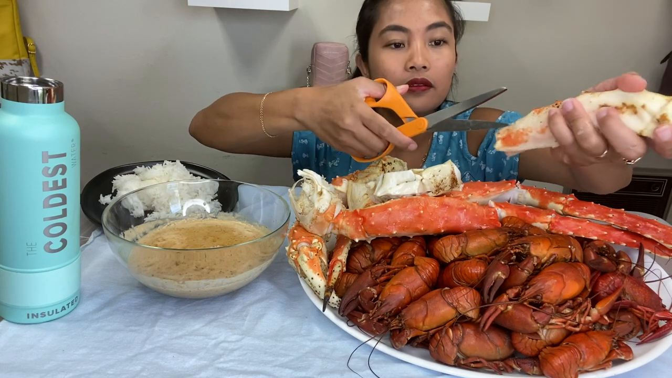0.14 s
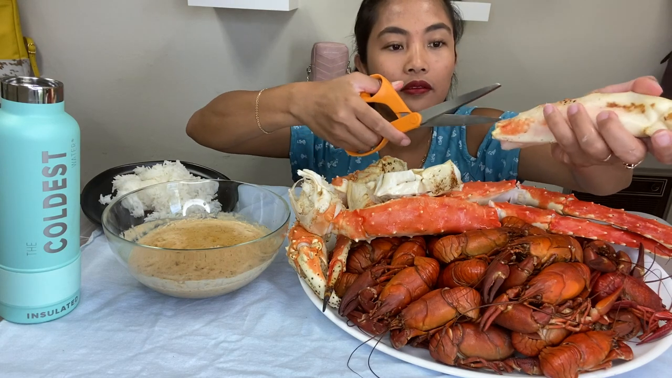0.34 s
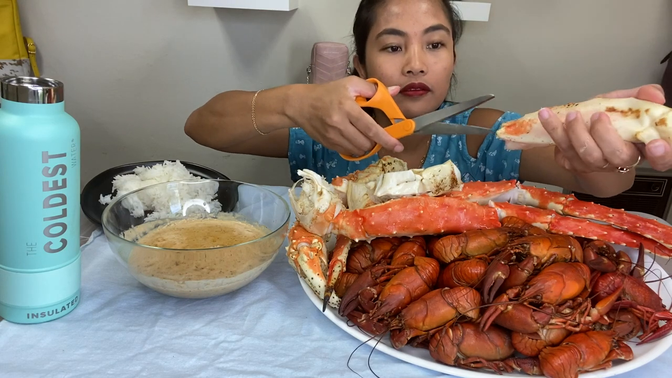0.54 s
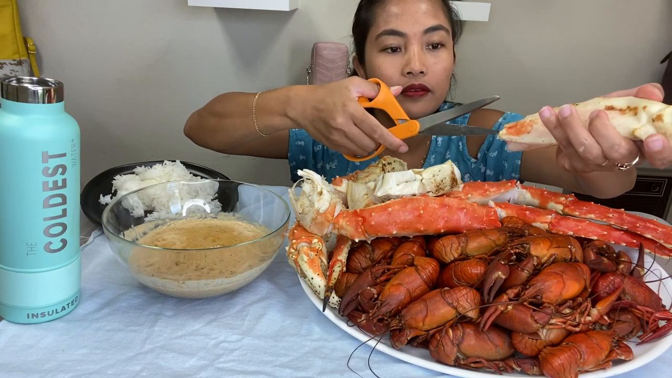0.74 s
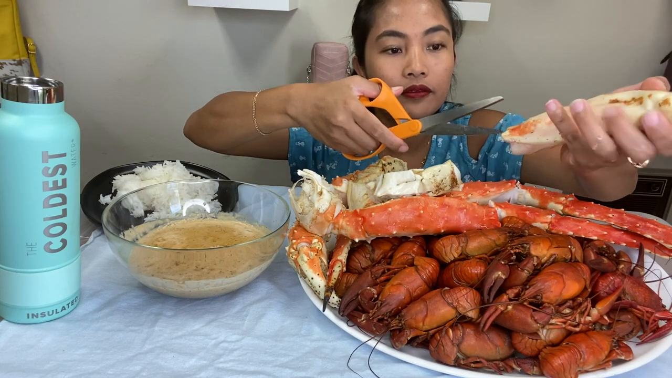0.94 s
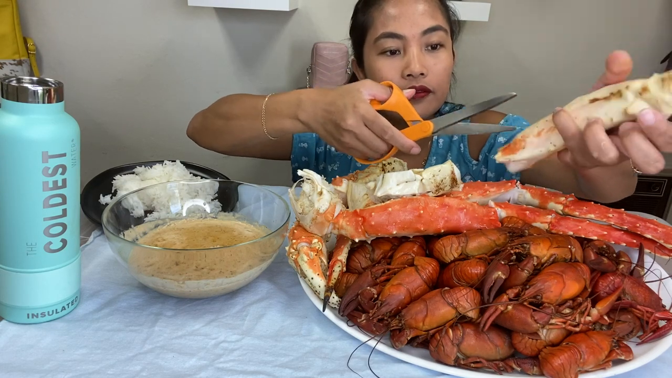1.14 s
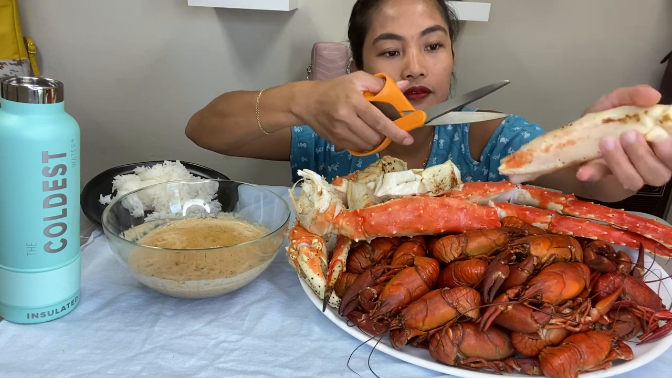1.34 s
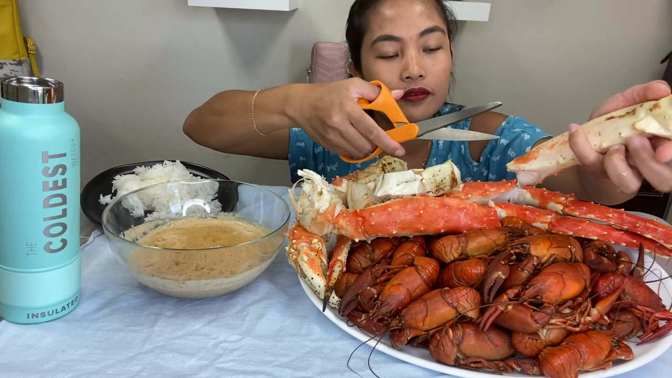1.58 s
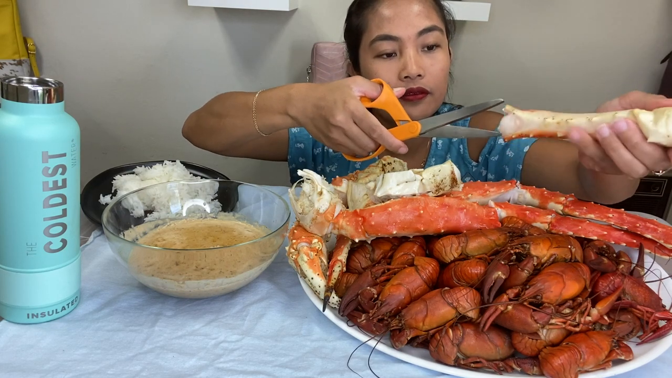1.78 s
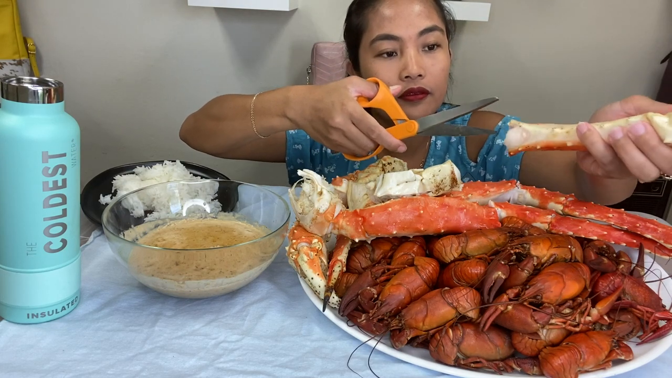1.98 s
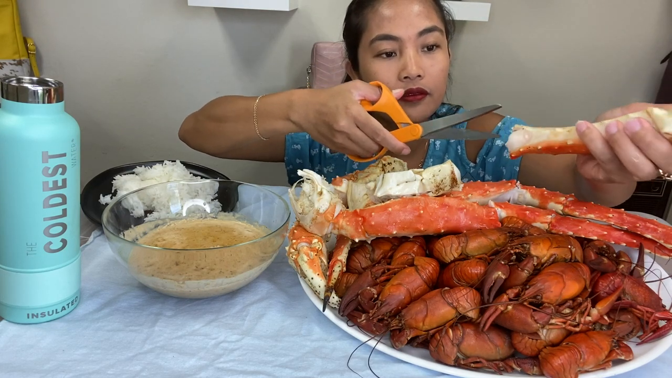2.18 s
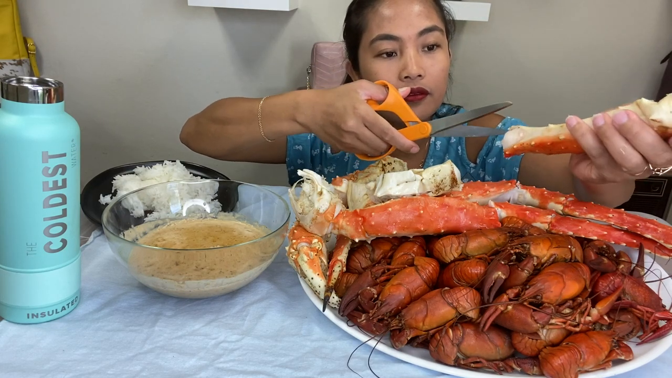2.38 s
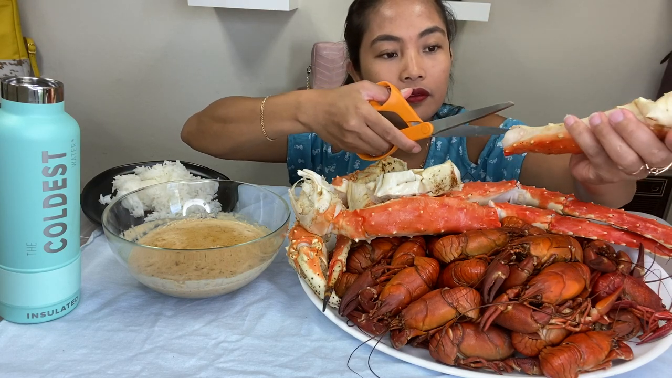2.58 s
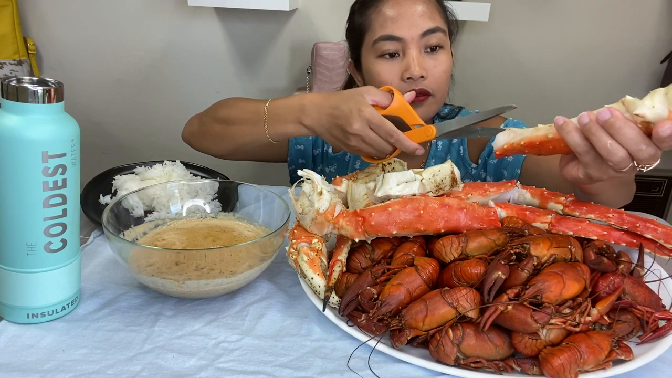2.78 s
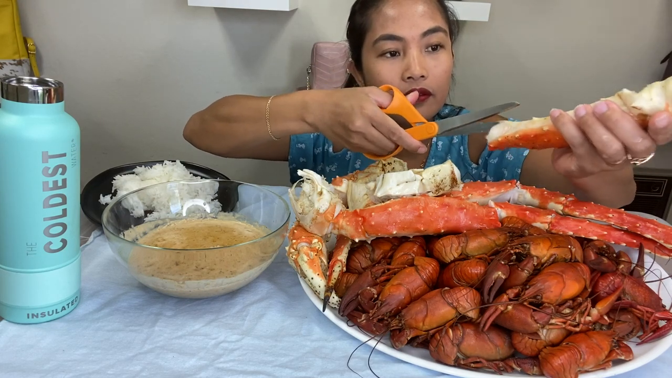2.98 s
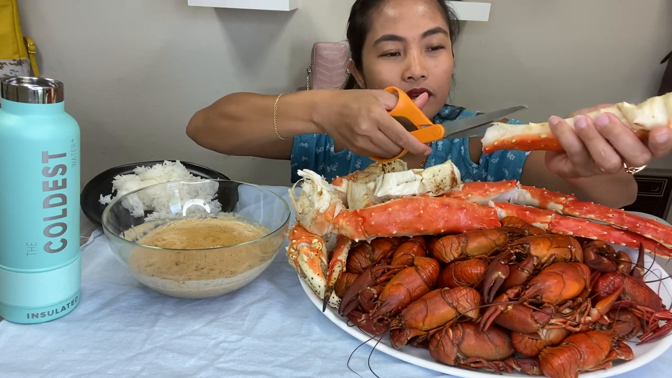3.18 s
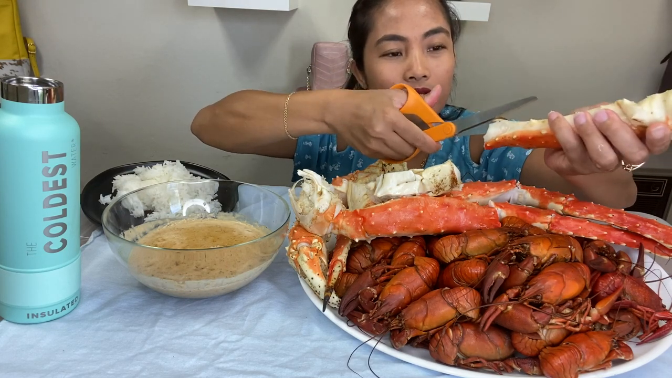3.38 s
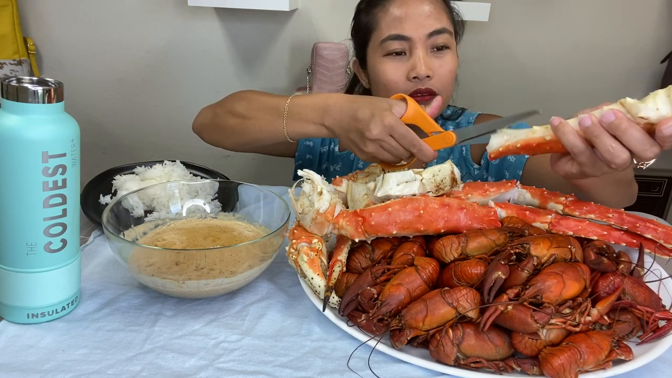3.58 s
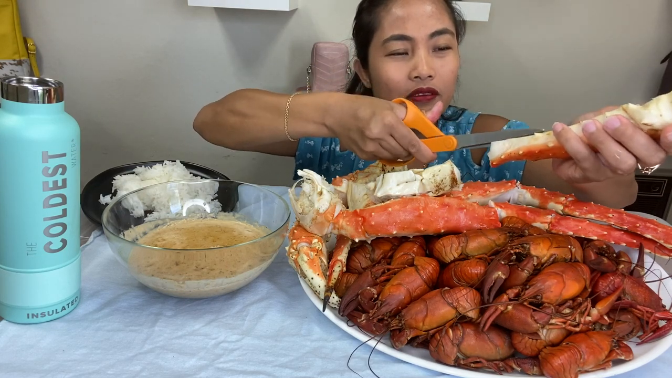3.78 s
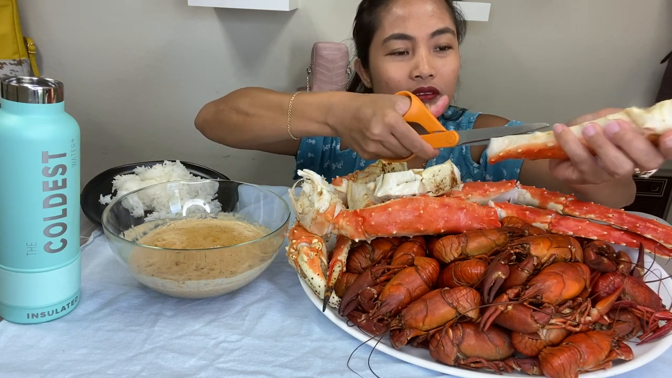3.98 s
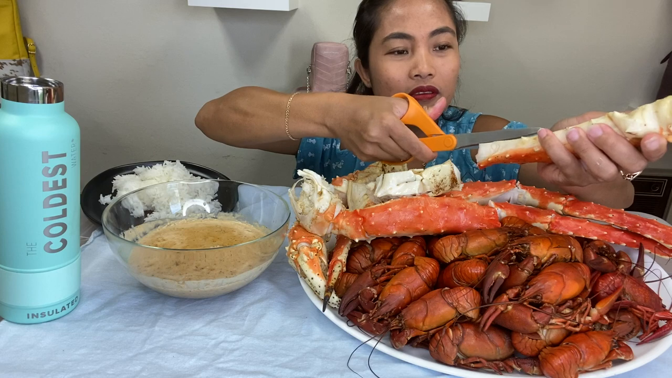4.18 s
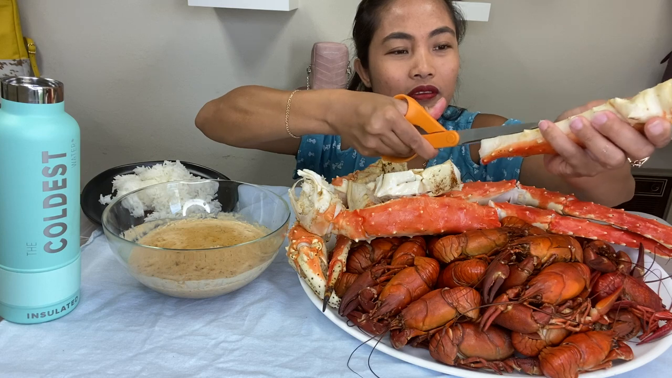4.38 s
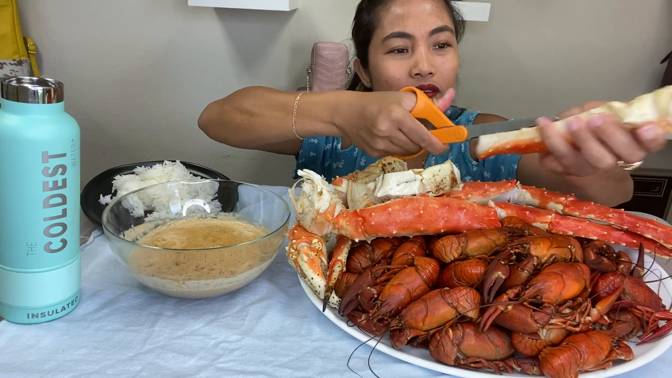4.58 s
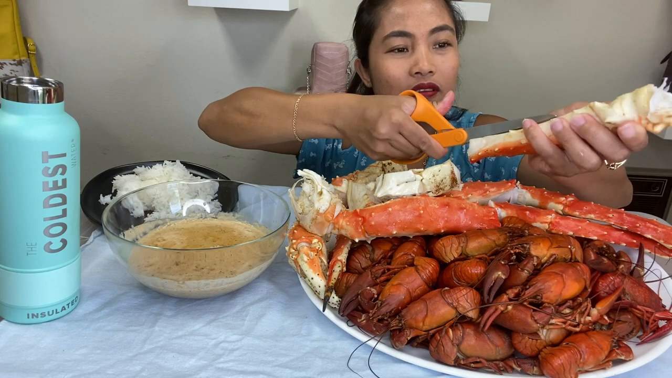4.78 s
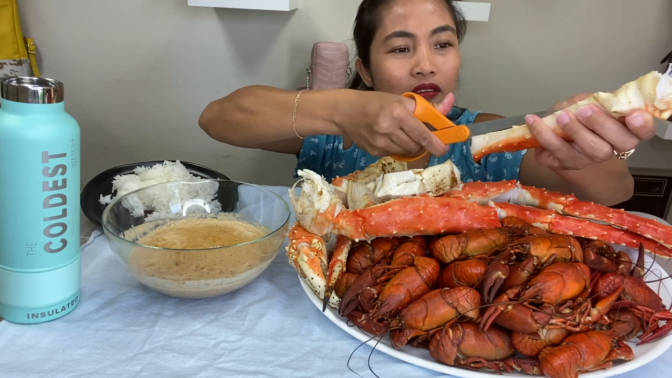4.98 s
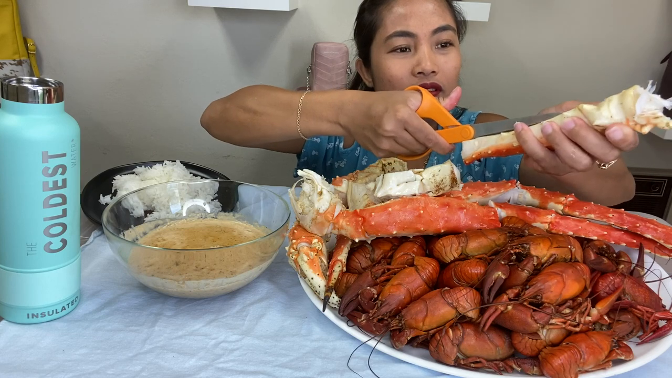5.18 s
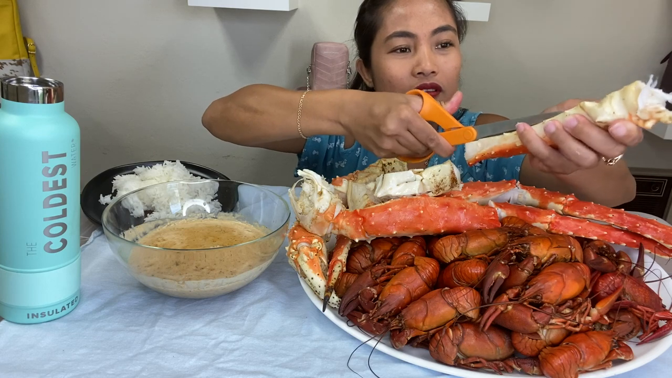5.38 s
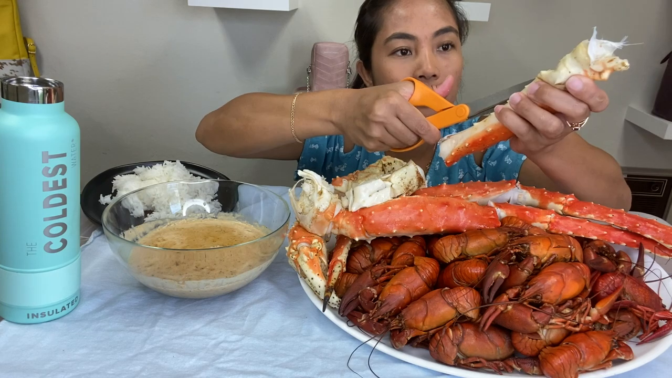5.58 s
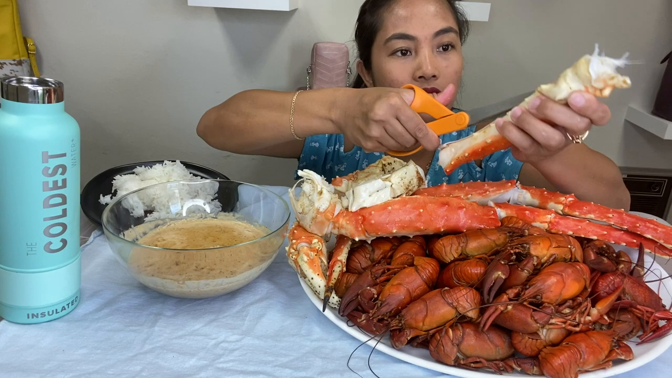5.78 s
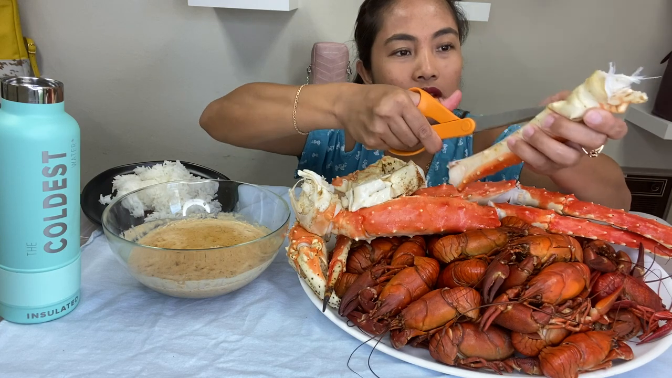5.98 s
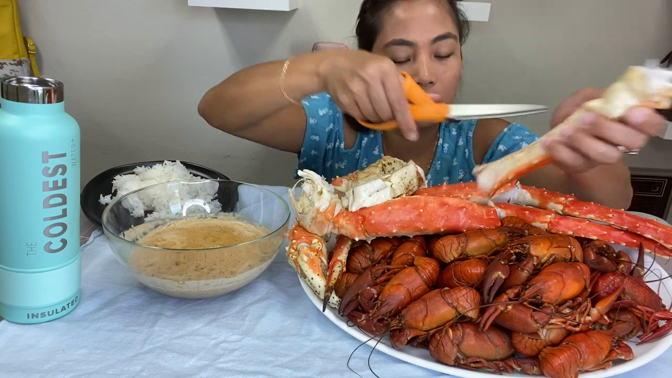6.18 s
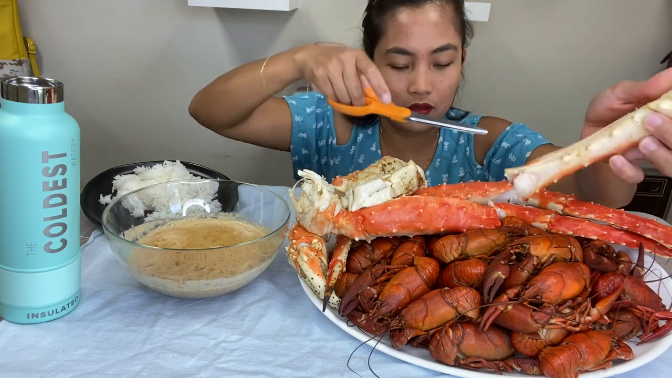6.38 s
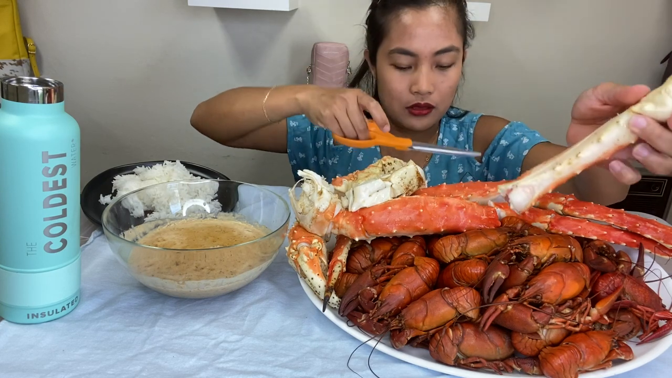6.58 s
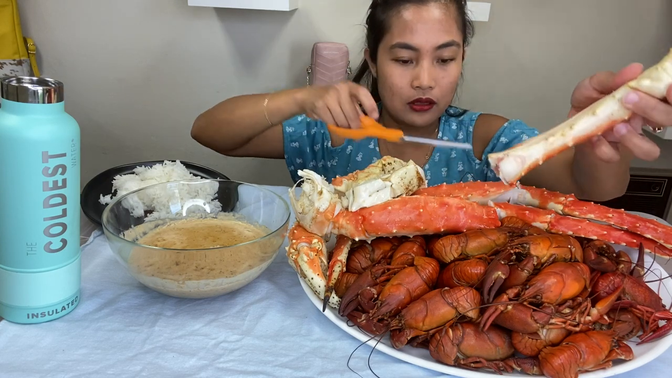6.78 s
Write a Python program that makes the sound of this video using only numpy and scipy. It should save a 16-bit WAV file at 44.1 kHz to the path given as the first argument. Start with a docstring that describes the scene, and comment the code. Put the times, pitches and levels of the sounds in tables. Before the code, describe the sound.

Kitchen scissors work on a hard crab leg at a dining table. For over three seconds there are only faint taps and light scrapes over low house rumble. Then separate squeezes crunch through the shell in clusters of sharp, dry cracks, with brief steel hiss between, easing to two last snaps and a faint tap. Close stereo microphone, cutting slightly right, short furnished-room reverberation.

```python
"""At a dining table in a small furnished room, kitchen scissors cut along a hard crab leg.
The cutting is to the right of a two-port microphone: the left port trails.
Each squeeze breaks the shell in a few sharp cracks, noise bursts ringing resonances, over fine crackle.
The blades hiss as they slide, filtered spiky noise; taps and scrapes of the blades touch the shell.
Table echoes and decaying-noise reverberation answer, over the low rumble and air of the house."""
import sys
import numpy as np
from scipy import signal
from scipy.fft import rfft, irfft, next_fast_len
from scipy.io import wavfile
from scipy.ndimage import uniform_filter1d, map_coordinates

SR = 44100
rng = np.random.default_rng(int(sys.argv[2]) if len(sys.argv) > 2 else 0)


def dump(signal):
    """Clip the signal to [-1, 1] and save it as 16-bit WAV at the path in sys.argv[1]."""
    limited = np.clip(np.atleast_2d(signal).T, -1, 1)
    pcm = np.round(limited * 32767).astype(np.int16)
    wavfile.write(sys.argv[1], SR, pcm)


N = 302085  # length [samples]

# resonances of the whole shell: (centre [Hz], width [Hz], relative level [dB])
SHELL_MODES = [(736, 225, 2.5), (1206, 976, -0.5), (2576, 1620, 1), (3900, 2460, -0.5), (7500, 3200, -0.5),
               (9870, 3500, -3.5), (14600, 2500, -11.5)]


def cracks():
    """Brittle fracture: each sudden break excites the free vibrations of the shell."""
    # shell cracks: (time [s], level [dB], ring of the piece under the blade [Hz],
    # its relative level [dB], treble shelf [dB], length [ms])
    fractures = [(3.5257, -45.5, 1070, 27, 26, 3.5), (3.5567, -34.5, 1040, 14.5, 16, 2.3),
                 (3.5805, -28, 4050, 5.5, 12, 3.1), (3.5841, -19.5, 684, 7.5, 14, 2.4),
                 (3.6313, -43, 4370, 10.5, -2, 4.5), (3.6899, -30.5, 1030, 14.5, 14, 2.9),
                 (3.7195, -33, 4000, 5.5, 1, 4), (3.7255, -22, 1080, 6.5, 4, 4.9),
                 (3.7299, -20.5, 3950, 12.5, 14.5, 2.8), (3.7585, -27, 4200, 7.5, 13, 3.5),
                 (3.7641, -19.5, 616, 17.5, 20, 4.7), (3.7684, -21, 3370, 7, 12.5, 9.6),
                 (3.7987, -37.5, 3340, 4, 8, 3.6), (4.2501, -36, 1160, -19, 14.5, 5),
                 (4.2585, -28.5, 3610, 4.5, 3.5, 4.1), (4.266, -15.5, 2710, 6.5, 9, 2.7),
                 (4.2827, -19, 1150, 7, 9.5, 4.4), (4.306, -12, 1277, 18.5, 7, 3.5),
                 (4.3338, -18, 1480, 22.5, 17, 3), (4.6183, -23.5, 1490, 10, 6.5, 3.9),
                 (4.842, -18, 1280, 6.5, 0.5, 3), (4.8454, -14, 1307, 25.5, 17, 2.8),
                 (4.8536, -40, 1930, -10, 7, 5.1), (4.8678, -20.5, 1320, 2, 0.5, 1.6),
                 (4.873, -23.5, 1350, 10, -8, 1.17), (4.8891, -21, 694, 5.5, -3.5, 5.9),
                 (4.8928, -23.5, 1430, 14, 9, 9.8), (4.9178, -26, 1290, 9, -5.5, 5.4),
                 (4.9224, -25.5, 630, 6.5, 3, 6.1), (5.0743, -45, 1110, 37, -22, 6),
                 (5.0985, -31.5, 1600, 7.5, -16, 2.6), (5.1169, -20.5, 1310, -0.5, -17, 8.3),
                 (5.1296, -25, 1410, 7, -9, 4.2), (5.1376, -33, 1380, 10, -10.5, 4.5),
                 (5.1621, -17, 3150, 7, 9.5, 2.6), (5.3862, -27, 1400, 1.5, -1.5, 4.9),
                 (5.3923, -20.5, 2540, 8.5, 1.5, 2.5), (5.408, -18, 1890, -2, 8, 0.69),
                 (5.4116, -20, 1370, 9, 2.5, 4.4), (5.4345, -21.5, 1240, 7.5, -14, 2.3),
                 (5.44, -11, 1260, 11.5, 7, 5.4), (5.4448, -21.5, 2300, 13, 0.5, 7.4),
                 (5.4551, -25, 2600, 7.5, -0.5, 5.8), (5.7057, -43, 1130, 9, -2, 5.2),
                 (5.7435, -29.5, 1400, 2, -7, 3.1), (5.75, -19.5, 1100, 7, 0, 3.7),
                 (5.7781, -33, 840, -4, -10.5, 4.5), (5.798, -33.5, 875, 5, -5.5, 14),
                 (5.8198, -29, 1550, 16.5, 0.5, 3.5), (5.823, -24, 1250, 4.5, -7, 5),
                 (5.8795, -27.5, 1870, 14, 1.5, 4.8), (5.8868, -21, 1164, 6.5, -5.5, 6.7),
                 (5.8951, -32, 500, 14.5, -4, 5), (6.034, -14.5, 1420, 19.5, -11.5, 3.4),
                 (6.0553, -43.5, 1630, 12.5, -18, 5.4), (6.1307, -19.5, 1143, 20, -5.5, 2.2),
                 (6.1409, -41.5, 1520, 13, -17, 5.3)]
    return blows(fractures, plate=(3500, 0.24, 0), hollow_q=3.8, plate_q=7.7)


def taps():
    """Impact excitation: light taps of blade and fingers ring the shell without cutting it."""
    # taps: (time [s], level [dB], ring of the piece struck [Hz],
    # its relative level [dB], treble shelf [dB], length [ms])
    contacts = [(0.0409, -34.5, 2810, 9.5, -8.5, 5.1), (0.0713, -43, 600, 8.5, -24, 2.6),
                (0.1883, -47.5, 1000, 13.5, -10, 7.3), (0.2191, -42.5, 1300, 8, -15, 5),
                (0.2384, -47.5, 1000, 14, -13, 24), (0.259, -40.5, 1074, 10, -20, 7.5),
                (0.6492, -51.5, 753, 12, -22, 1.9), (0.9181, -58.5, 4500, -6, -16, 6.2),
                (1.1756, -51.5, 1300, 4, -22, 2.4), (1.3298, -49.5, 3130, 10, 5.5, 3.4),
                (1.5037, -36, 569, 17.5, -14, 2.4), (1.5494, -54, 530, 13, -7, 5),
                (1.558, -52.5, 1020, 18, -6, 3.8), (1.5923, -46.5, 840, 23, 3, 8.1),
                (1.6114, -36, 1076, 17.5, -0.5, 7.2), (2.6325, -59.5, 3370, 14, -15, 3.2),
                (3.3949, -44.5, 3980, 0, -14.5, 3.3), (3.4799, -65, 2890, 10, -6, 5),
                (6.3545, -48.5, 553, 17, 6, 1.93), (6.6759, -48.5, 670, 2, -21, 1.34)]
    return blows(contacts, plate=(2510, 0.055, 5.2), hollow_q=5.4, plate_q=4.1)


def blows(strikes, plate, hollow_q, plate_q):
    """Modal superposition: each blow rings the whole shell, the local piece and a loose plate.

    plate: (usual frequency [Hz], log-frequency spread from blow to blow, relative level [dB])
    """
    rise_share = 0.59  # part of a blow's length spent swelling
    plate_follows = 0.56  # a bright blow also rings the plate harder [dB per dB of treble]
    lead, edge_hz = SR // 50, 3500  # samples ahead of the blow; corner of the treble shelf
    out = np.zeros(N + SR)
    t = (np.arange(4096) - lead) / SR
    usual_hz, spread, plate_db = plate
    for s, db, hollow_hz, hollow_db, treble_db, ms in strikes:

        def shelf(hz):
            """Second-order shelf: the treble is tilted by treble_db."""
            w = 1j * hz / edge_hz
            return (1 + amp(treble_db) * w ** 2 + 1.4 * amp(treble_db / 2) * w) / (1 + w) ** 2

        plate_hz = usual_hz * np.exp(spread * rng.standard_normal())
        hollow_mode = (hollow_hz, hollow_hz / hollow_q, hollow_db)
        plate_mode = (plate_hz, plate_hz / plate_q, plate_db + plate_follows * treble_db)
        local = modes([hollow_mode, plate_mode])
        shell = modes(SHELL_MODES)

        burst = splinters(t, rise_share * ms / 1000, (1 - rise_share) * ms / 1000)
        sound = filtered(burst, lambda hz: shelf(hz) * shell(hz) + local(hz))
        loudest = np.sqrt(uniform_filter1d(sound ** 2, size=60).max())
        out[round(s * SR) - lead:][:len(t)] += amp(db) * sound / loudest
    return out[:N]


def splinters(t, rise, fall):
    """Broadband excitation: a run of splinters swells steeply to t = 0, dies away and is near white."""
    rise, fall = np.clip([rise, fall], .0002, .008)
    shape = np.exp(np.where(t < 0, -(t / rise) ** 2, -t / fall))
    spectrum = rfft(spiky(len(t), scatter_db=4.0) * shape)
    burst = irfft(spectrum / np.abs(spectrum), len(t))  # flat spectrum, phases kept
    power = np.abs(uniform_filter1d(burst ** 2, size=24))
    return burst * shape / np.sqrt(power + 1e-3 * np.max(burst ** 2))  # swell restored


def crackle():
    """Crackling noise: many tiny fractures, in clumps, ring the shell."""
    # squeezes that grind the shell: (full strength at [s], rise [s], hold [s], level [dB])
    squeezes = [(3.58, 0.098, 0.036, -60), (3.745, .07, 0.012, -42.5), (4.275, 0.041, 0.068, -41.5),
                (4.86, 0.039, 0.062, -42.5), (5.12, 0.056, 0.038, -43), (5.42, .05, 0.043, -39),
                (5.77, 0.049, 0.16, -53), (6.04, .015, 0.076, -53)]
    clump_db = 4.5 * map_coordinates(rng.standard_normal(N // 90 + 4), [np.arange(N) / 90])
    fractures = patchy(amp(clump_db) * spiky(N, scatter_db=4), depth_db=4)
    grit = filtered(fractures, modes(SHELL_MODES))
    return gain(squeezes, fade_db=290) * unit(grit)


def slide():
    """Sliding friction: steel on steel gives a fine even hiss."""
    # blades sliding over each other: (full strength at [s], rise [s], hold [s], level [dB])
    strokes = [(3.02, 0.095, 0.015, -62.5), (4.0, 0.067, 0.019, -47), (4.555, 0.031, .055, -44),
               (5.5, .015, 0.019, -51)]
    # relative spectrum of the hiss: (frequency [Hz], level [dB per Hz])
    hiss_spectrum = [(700, -17), (1300, -9.5), (2300, -6), (3600, 0.5), (5300, -1.5), (8000, 0),
                     (10200, -8.5), (12000, -9.5), (16000, -31)]
    hiss = filtered(spiky(N, scatter_db=9.0), lambda hz: amp(along(hiss_spectrum, hz)))
    return gain(strokes, fade_db=730) * unit(hiss)


def scrape():
    """Friction on a rough surface: steel on shell is grainier and rings the blade tips."""
    # tips scraping lightly on the shell: (full strength at [s], rise [s], hold [s], level [dB])
    strokes = [(.06, .015, 0.027, -63.5), (.22, 0.048, 0.057, -75), (.93, 0.047, 0.02, -68),
               (1.275, 0.075, 0.0064, -67), (1.345, .012, 0.017, -82), (1.435, 0.11, 0.0046, -71),
               (1.6, .15, .04, -66), (2.75, 0.11, 0.026, -79), (3.41, .015, .015, -85),
               (6.288, 0.086, .005, -60)]
    # resonances of the blade tips: (centre [Hz], width [Hz], relative level [dB])
    tip_modes = [(3180, 630, 8), (4280, 1200, -5), (6860, 3000, -1)]
    grain = filtered(patchy(spiky(N, scatter_db=5), depth_db=4), modes(tip_modes))
    return gain(strokes, fade_db=520) * unit(grain)


def gain(strokes, fade_db):
    """Amplitude envelope: strokes rise, hold and then fade by fade_db a second."""
    rise_db = 19.5  # a stroke sets in this far under its full strength
    s, rise, hold, db = np.transpose(strokes)[..., None]
    t = np.arange(N) / SR - s
    level_db = db + rise_db * np.minimum(t / rise, 0) - fade_db * np.maximum(t - hold, 0)
    return np.sum(amp(level_db) * (t > -rise), axis=0)


def spiky(size, scatter_db):
    """Impulsive noise: samples differ widely in size, as splintering does."""
    return unit(rng.standard_normal(size) * amp(scatter_db * rng.standard_normal(size)))


def patchy(x, depth_db):
    """Time-varying spectrum: the colour changes from one fracture to the next."""
    z = signal.stft(x, nperseg=128)[2]
    field = uniform_filter1d(rng.standard_normal(z.shape), size=3, axis=0)
    field = uniform_filter1d(field, size=3, axis=1)
    return signal.istft(z * amp(depth_db * unit(field)), nperseg=128)[1][:N]


def modes(resonances):
    """Modal response: the causal sum of damped resonances, with alternating signs."""
    return lambda hz: sum((-1) ** k * amp(db) * 1j * hz * width / (centre ** 2 - hz ** 2 + 1j * hz * width)
                          for k, (centre, width, db) in enumerate(resonances))


def filtered(x, response):
    """Linear filtering: the spectrum of x times a complex response of frequency."""
    m = next_fast_len(x.shape[-1] + 4096)  # padded against wrap-around
    return irfft(rfft(x, m) * response(np.fft.rfftfreq(m, 1 / SR)), m)[..., :x.shape[-1]]


def along(points, hz):
    """Logarithmic frequency scale: interpolate (frequency [Hz], value) points on it."""
    f, v = np.transpose(points)
    return np.interp(np.log(hz + 1), np.log(f + 1), v)


def amp(db):
    """Decibel law: a level in dB as an amplitude ratio."""
    return 10 ** (np.asarray(db) / 20)


def unit(x):
    """Root-mean-square normalisation: scale x to an RMS of one."""
    return x / np.sqrt(np.mean(x ** 2) + 1e-20)


def heard(x):
    """Superposition of paths: the direct sound, the table echoes and the room."""
    # what the room sends back: (frequency [Hz], relative level [dB])
    walls = [(300, 10), (1000, 0), (3000, -1), (8000, 0.5), (15000, -5)]
    direct = x * amp([[-.2], [.2]])  # left, right
    wet = room(filtered(x, lambda hz: amp(along(walls, hz))), alike=.15)
    return direct + table_echoes(x) + amp(-6.5) * wet


def table_echoes(x):
    """Specular reflection: a few close echoes, at other moments on each port."""
    # echoes off table and dishes: (left delay [s], right delay [s], level [dB])
    echoes = [(.0016, 0.0023, -17.5), (.0033, 0.0021, -22.5), (.0046, .0052, -12.5)]
    left, right, db = np.transpose(echoes)[..., None]

    def response(hz):
        return np.array([np.sum(amp(db) * np.exp(-2j * np.pi * hz * s), axis=0) for s in (left, right)])

    return filtered(x, response)


def room(x, alike):
    """Exponential reverberant decay: each frequency dies at its own speed, in new noise every 0.1 s."""
    # reverberation time: (frequency [Hz], time to fall by 60 dB [s])
    decay = [(300, 0.28), (800, 0.16), (2000, 0.2), (5500, 0.16), (13000, 0.18)]
    out, step = np.zeros((2, N + SR)), SR // 10
    for start in range(0, N, step):
        hz, t, z = signal.stft(rng.standard_normal((2, SR // 3)), SR, nperseg=256)
        fade = amp(-60 * t / along(decay, hz)[:, None])
        a, b = signal.istft(z * fade, SR, nperseg=256)[1]
        tail = np.array([a + alike * b, b + alike * a]) / np.linalg.norm(a)
        wet = signal.fftconvolve(x[None, start:start + step], tail, axes=1)
        out[:, start + 260:][:, :wet.shape[1]] += wet  # 260 samples after the direct sound
    return out[:, :N]


def house():
    """Partial coherence: rumble and air of the house, most alike at both ports in the bass."""
    # relative spectrum: (frequency [Hz], level [dB per Hz])
    spectrum = [(15, -54.5), (25, -13.5), (48, -3), (102, -6.5), (200, -14.5), (263, -20), (344, -22.5),
                (384, -30), (887, -26), (1260, -38.5), (5280, -50), (7710, -47), (10000, -51.5),
                (12000, -54.5), (14200, -60), (14600, -82.5), (16000, -101.5)]
    # the rumble swells and dips, relative to its median: (time [s], level [dB])
    rumble_db = [(0.0, -56.5), (0.07, -47), (0.55, -53), (2.27, -49.5), (2.33, -43), (2.4, -52.5),
                 (2.88, -49.5), (3.01, -61), (3.15, -47), (3.2, -54.5), (3.83, -46), (3.91, -52.5),
                 (6.72, -50), (6.85, -43.5)]
    # left-right likeness: (frequency [Hz], correlation [-1 to 1])
    likeness = [(60, .87), (130, 0.88), (290, 0.46), (640, 0.067), (1400, 0.059), (3000, 0.15), (7000, 0.3),
                (14000, 0.5)]

    def split(hz):
        """Shares of the common and the opposed part that give the wanted correlation."""
        turn = np.arccos(np.clip(along(likeness, hz), -1, 1)) / 2
        return amp(along(spectrum, hz)) * [np.cos(turn), np.sin(turn)]

    common, opposed = filtered(rng.standard_normal((2, N)), split)
    air = amp(-49.0) * unit(np.array([common + opposed, common - opposed]))
    bass = filtered(air, lambda hz: 1 / (1 + (hz / 250) ** 4))
    swell = amp(np.interp(np.arange(N) / SR, *np.transpose(rumble_db)))
    return air - bass + bass * swell / np.median(swell)  # only the rumble swells


def scene():
    """Superposition: the cutting as heard in the room, and the house."""
    cut = cracks() + taps() + crackle() + slide() + scrape()
    before = np.arange(N) < 5.555 * SR  # whatever of the cutting still rings at 5.555 s breaks off
    return heard(cut * before) * before + heard(cut * ~before) + house()


def ports(pair):
    """Interaural-style phase lag: the left port trails, and the two ports draw together in the treble."""
    # the microphone case: (frequency [Hz], lag of the left port [rad])
    port_lag = [(300, .1), (2500, .75), (6000, 1.5), (8000, 2.1), (9500, 3.14), (12000, 6.28), (13500, 7.5),
                (14700, 9.4), (16600, 10.6)]
    # above shared_hz both ports pick up nearly the same sound; shared_db is left of their difference
    shared_hz, shared_db = 7400, -26.5

    def apart(hz):
        return 1 - (1 - amp(shared_db)) / (1 + (shared_hz / (hz + 1)) ** 6)

    def lag(hz):
        """Half the lag on each side."""
        return np.exp(-.5j * along(port_lag, hz) * np.array([[1], [-1]]))

    mid = pair.mean(axis=0)
    side = filtered((pair[0] - pair[1]) / 2, apart)
    return filtered(np.array([mid + side, mid - side]), lag)


def record(dry):
    """Soft saturation and band limiting: the input rounds off peaks, drops deep bass and ends by 16.8 kHz."""
    dry = ports(dry)
    soft = dry / (1 + np.abs(dry / .75) ** 3) ** (1 / 3)

    def band(hz):
        deep_bass = (hz / 34) ** 4 / (1 + (hz / 34) ** 4)
        treble = 1 / np.sqrt(1 + (hz / 15800) ** 60)
        limit = np.clip((16800 - hz) / 500, 0, 1) ** 2  # closes from 16300 to 16800 Hz
        return deep_bass * treble * limit

    return filtered(soft, band)


dry = scene()
out = record(dry)
dump(out)
```